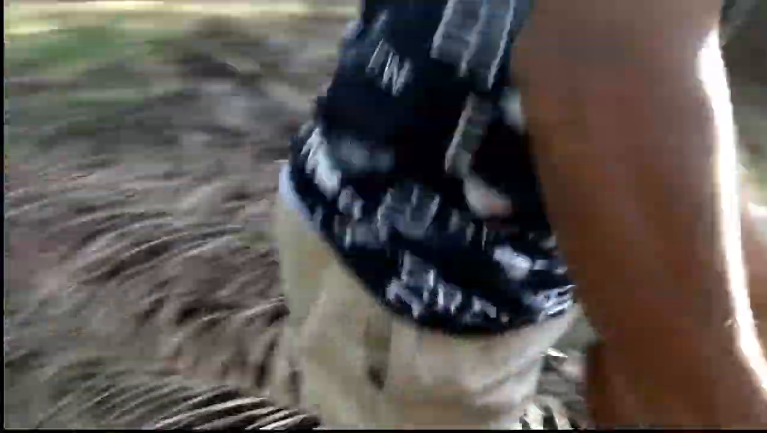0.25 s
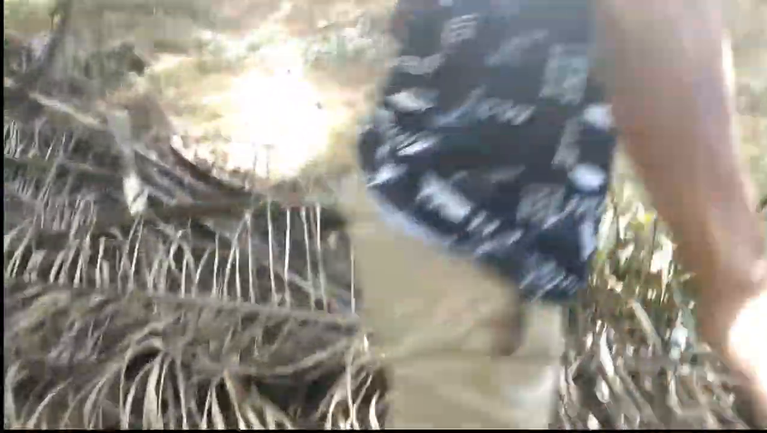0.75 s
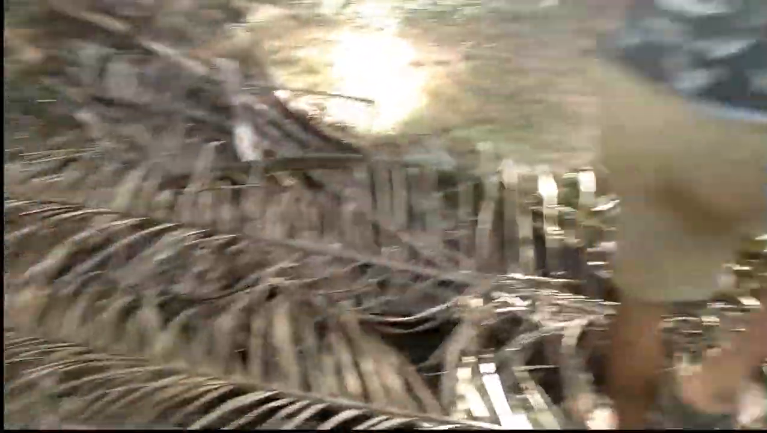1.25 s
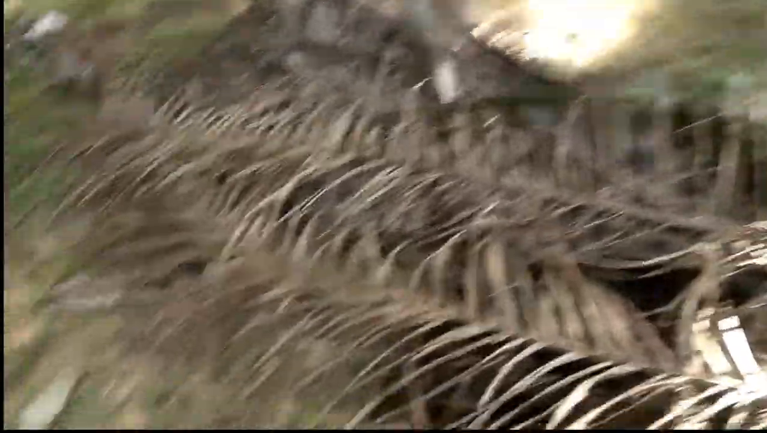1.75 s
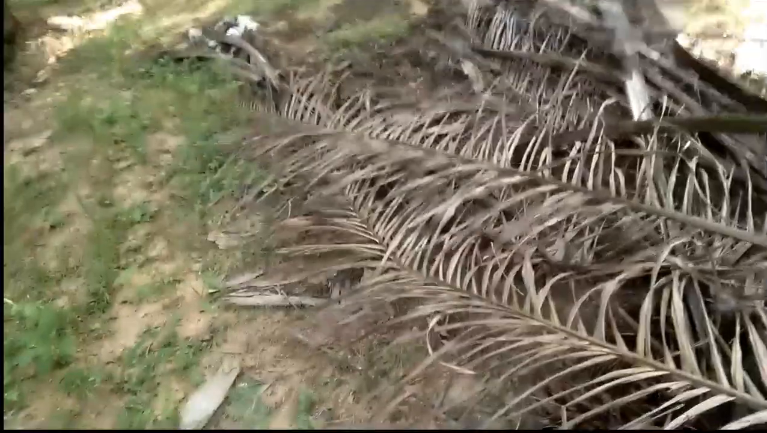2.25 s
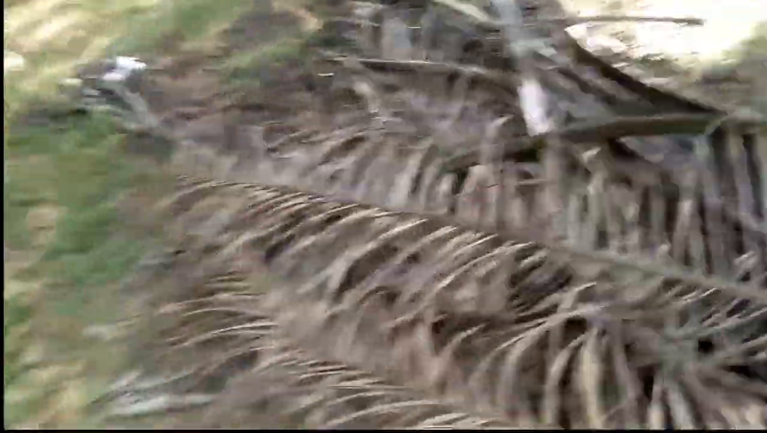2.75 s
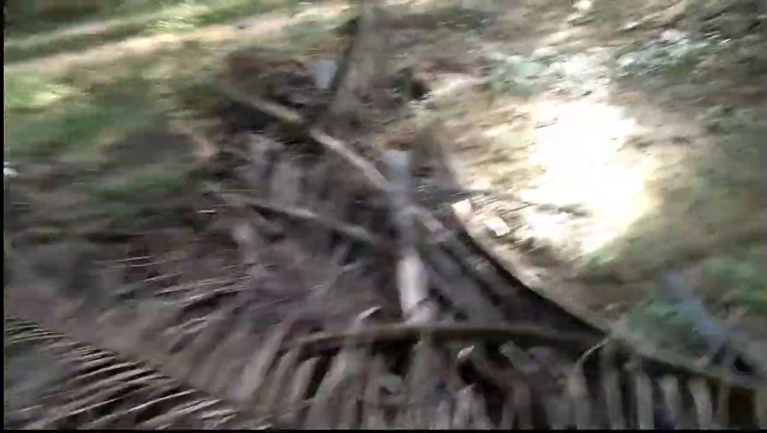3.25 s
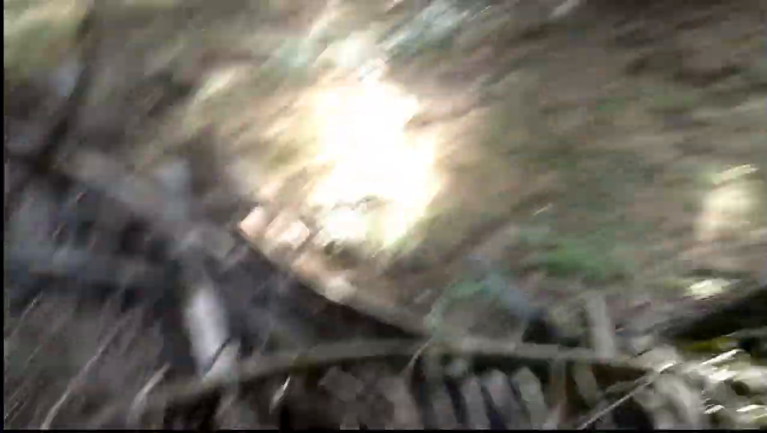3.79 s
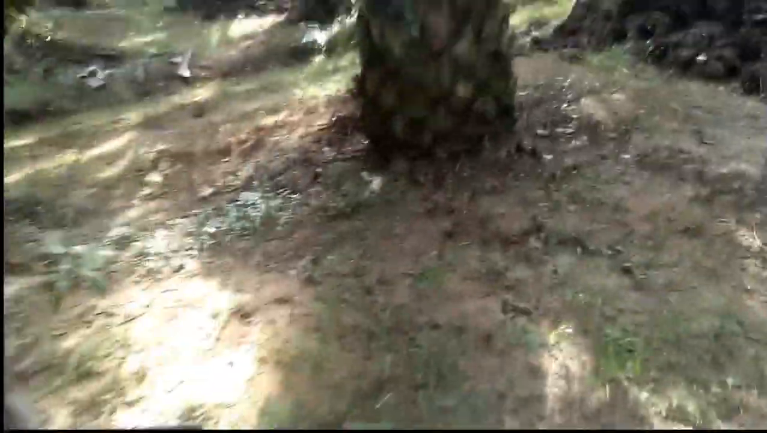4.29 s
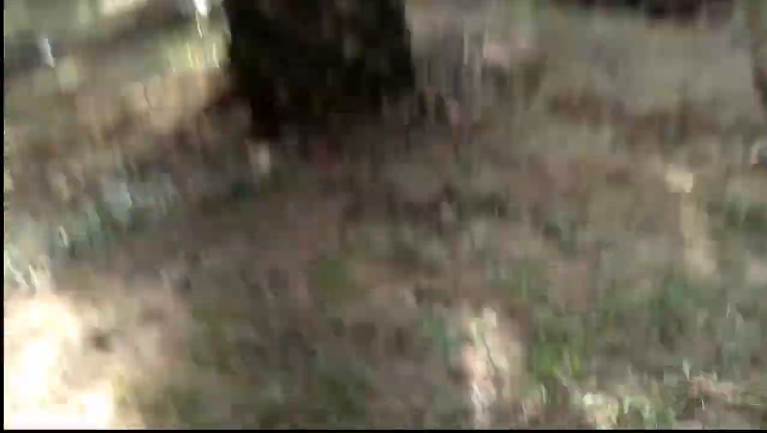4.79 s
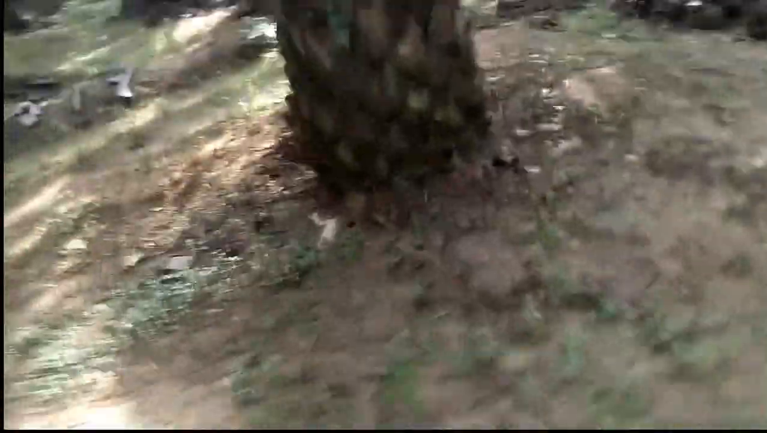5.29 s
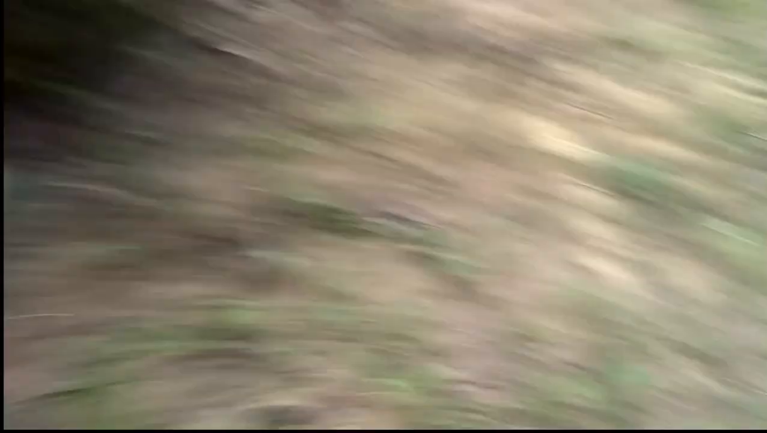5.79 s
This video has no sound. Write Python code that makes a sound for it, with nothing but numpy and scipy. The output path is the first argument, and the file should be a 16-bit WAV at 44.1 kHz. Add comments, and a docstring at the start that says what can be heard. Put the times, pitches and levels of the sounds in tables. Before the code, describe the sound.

Close to a handheld phone, dry palm fronds are brushed aside and trodden on in a quiet plantation. Crisp rustles and sharp snaps come in irregular bursts, loudest a little after two seconds, with a lull around four. Then snapping crowds together with hollow stalk knocks and a dull microphone bump before easing. Faint insects, a far engine and light wind lie beneath.

```python
"""Dry palm fronds are pushed aside and trodden on near a hand-held phone with two microphones.
Throughout, insects hiss in the plantation, a far engine hums and light wind rumbles (shaped noise).
Brittle leaflets rustle (many tiny cracks) and snap (short noise bursts) from the start, loudly near 2.2 s.
From 4.5 s snaps crowd together and hollow stalks knock (fading tones), most strongly near 5.15 s.
A frond jolts the left microphone twice near 5.3 s (sagging pressure steps), then the rustling eases."""
import sys
import numpy as np
from scipy import signal
from scipy.fft import rfft, irfft, next_fast_len
from scipy.io import wavfile
from scipy.ndimage import uniform_filter1d, map_coordinates

SR = 44100
rng = np.random.default_rng(int(sys.argv[2]) if len(sys.argv) > 2 else 0)


def int16_out(signal):
    """Quantize to a 16-bit WAV file."""
    q = np.round(np.clip(np.atleast_2d(signal).T, -1, 1) * 32767)
    wavfile.write(sys.argv[1], SR, q.astype(np.int16))


N = 265923  # length in samples

# Tone colour of the far hiss. Each row: frequency in Hz, gain in dB.
HISS_COLOUR = [(100, -43), (170, -18), (400, -2.5), (800, -24), (1500, -15), (3000, -12), (6000, -12),
               (10000, -21), (15300, -2)]
# The insect chorus, one row: centre in Hz, width of the resonance in Hz, level in dB.
INSECT_BAND = (7050, 720, -58.5)
# Resonances of the engine hum. Each row: centre in Hz, width in Hz, relative level in dB.
ENGINE_TONES = [(52, 9.6, 0), (94, 20, -38), (122, 16, -17.5), (322, 2.8, -21)]
# Tone colour of the wind rumble. Each row: frequency in Hz, gain in dB.
WIND_COLOUR = [(8, 7.5), (18, 5.5), (35, -2), (60, -14), (120, -47.5)]
# Wind strength over time. Each row: time in seconds, level in dB.
WIND_LEVELS = [(0, -53), (.32, -52), (.49, -63.5), (.94, -51), (1.55, -60.5), (2.95, -50), (3.6, -57),
               (3.92, -52), (4.11, -60), (4.95, -42), (5.24, -44), (5.8, -40), (6.03, -46)]
# How alike left and right are in far sounds. Each row: frequency in Hz, likeness from -1 to 1.
LEFT_RIGHT_LIKENESS = [(60, 0.93), (300, 0.71), (700, 0.2), (1400, -0.24), (3000, -0.78), (7000, 0.24)]
# Pushes on the left microphone. Each row: start in seconds, size of the step in dB.
MICROPHONE_JOLTS = [(5.2775, -16.5), (5.2993, -5.5)]
# Stalks knocked or trodden on. Each row: start in seconds, peak in dB, pitch in Hz.
STALK_KNOCKS = [(.993, -39, 670), (1.013, -33, 321), (1.016, -31, 700), (1.021, -31, 312),
                (2.155, -40.5, 507), (2.307, -40.5, 990), (4.895, -33, 980), (4.983, -24.5, 877),
                (5.139, -29, 706), (5.145, -14, 590), (5.15, -19, 806), (5.16, -21, 770),
                (5.186, -29.5, 786), (5.229, -18.5, 610), (5.299, -19.5, 706), (5.308, -16, 653),
                (5.503, -45.5, 306), (5.759, -40, 644), (5.875, -36.5, 650), (5.904, -42, 690),
                (6.012, -33, 376), (6.02, -28.5, 259), (6.026, -29, 330)]
# Single leaflets breaking. Each row: start in seconds, thin-leaf peak in dB,
# broad-leaf part in dB relative to that, left level minus right level in dB.
LEAF_SNAPS = [(.185, -16, -9.5, -0.5), (0.3183, -17.5, -12, -1), (0.6804, -28, -30, -6),
              (.7245, -27, -32, 6), (.7767, -24, -19, -4), (.793, -16.5, -14, 5), (.8249, -10.5, -31, 3.5),
              (.8463, -21, -15, 5), (.867, -13.5, -22, 5), (.937, -20, -12, 1), (.9502, -17.5, -14, 0),
              (.9678, -17, -15, 3), (0.995, -10, -20, -9), (1.0143, -10, -12.5, 7), (1.025, -16, -8, 0),
              (1.103, -22, -12, 11), (1.111, -20, -7, -4), (1.192, -24, -26, 1), (1.3147, -22, -17, 2),
              (1.342, -21.5, -19, 3), (1.3721, -24, -15, 1), (1.387, -21.5, -15, -4),
              (1.4263, -12.5, -24, 5.5), (1.706, -18, -27, 4), (1.7116, -9, -9, 5), (1.8706, -27, -37, 3.5),
              (2.021, -27.5, -22, -4), (2.1509, -14.5, -23, 6), (2.155, -3.5, -19.5, 3),
              (2.234, -1.5, -20, 7), (2.2486, -18, -17, 1), (2.6604, -29, -21, 10),
              (2.8489, -23.5, -21, 8.5), (2.8675, -23, -12, 4), (2.9022, -13.5, -15, 5),
              (2.917, -26, -20, 9), (2.943, -11.5, -33, 11.5), (3.4744, -16.5, -23.5, 2),
              (3.5602, -9.5, -19.5, 2.5), (4.48, -21, -29, 10), (4.5325, -6.5, -23, 5),
              (4.5984, -17, -9, 3), (4.6472, -4, -14, 0), (4.8108, -25, -9, 2), (4.8763, -21, -20, 3),
              (4.8955, -20, -10, 5), (4.9839, -7.5, -11, 2), (5.081, -18, -8, -3), (5.096, -10.5, -18, 9),
              (5.1399, -8.5, -2.5, 8), (5.1463, -5.5, -7, 2), (5.149, -10, -6, 6), (5.1639, -6, -6, 9.5),
              (5.1684, -12, -17, 2), (5.2136, -5.5, -20, 1), (5.219, -9, -13, 5), (5.2291, -5, -15, 4),
              (5.2601, -15, -16, 5), (5.2782, -5, -15, 2), (5.2945, -8.5, -10, 14), (5.2995, -5, 1, 2.5),
              (5.3062, -12, -13, 0), (5.4264, -24, -23, 7), (5.669, -31, -15, 7), (5.696, -30, -19, -7),
              (5.7236, -26.5, -13, 8), (5.7595, -20, -13.5, .5), (5.8085, -14.5, -23, 6),
              (5.8613, -8.5, -13, 8), (5.8735, -17, -21, 10), (5.9042, -10, -14, 7),
              (5.9607, -17, -22, 13.5)]
# Fronds brushed, pulled or crushed. Each row: loudest moment in seconds, level in dB, seconds to rise
# 20 dB, seconds to fall 20 dB, then broad leaves and stalks, both in dB relative to the level.
FROND_STROKES = [(0, -43.5, .1, .6, -11, -15.5), (.31, -37, 0.47, 0.17, -13, -17),
                 (.7, -46, 1.3, 0.7, -12, -17), (.838, -32, .04, 0.2, -15, -17),
                 (1.016, -19.5, 0.0079, 0.05, -9.5, -14), (1.06, -34, 0.26, .15, -11.5, -28),
                 (1.119, -36.5, 0.2, 0.23, -10.5, -30), (1.384, -35, .02, .035, -20, -35),
                 (1.433, -40, 0.1, 0.03, -14.5, -20), (1.505, -44, 0.1, 0.16, -7.5, -24),
                 (1.632, -36.5, .03, .2, -15, -15), (1.672, -32, .05, .05, -13, -27),
                 (1.71, -28, .012, .15, -15, -28), (2.158, -36, 0.21, 0.37, -9.5, -26),
                 (2.247, -33, 0.07, 0.15, -19, -28), (2.495, -33, 0.1, .16, -14.5, -30),
                 (2.754, -44, .5, 0.7, -14, -25), (2.954, -33.5, 0.15, 0.35, -11.5, -16.5),
                 (3.098, -35, 0.46, .42, -13.5, -20), (3.44, -43, 0.03, 0.1, -13, -17),
                 (3.485, -34, 0.1, 0.16, -15.5, -17.5), (3.56, -39.5, 0.07, 0.1, -13.5, -17),
                 (3.912, -43.5, 0.27, 0.17, -9.5, -9.5), (4.42, -41, .04, .3, -7, -14),
                 (4.489, -35.5, 0.1056, .15, -10, -24), (4.539, -28.5, 0.06, 0.17, -15, -22),
                 (4.6, -30, .1, .1, -11, -20), (4.675, -22.5, .15, .075, -12.5, -22),
                 (4.78, -39, 0.06, .2, -11, -16.5), (4.905, -35, 0.09, 0.26, -7, -13),
                 (4.998, -22, .055, 0.0829, -10.5, -13), (5.092, -31.5, 0.07, .09, -7.5, -9),
                 (5.144, -18, 0.0169, .19, -9, -12.5), (5.21, -27, 0.14, .16, -13, -13),
                 (5.303, -15.5, 0.0165, 0.0427, -5.5, -16.5), (5.329, -28.5, 0.03, 0.16, -8, -16),
                 (5.6, -50, 0.5, .1, -8, -14), (5.772, -44.5, 0.2, 1.5, -20, -18),
                 (5.869, -32, 0.12, 0.15, -11, -20), (6.03, -41, 0.48, -2, -7.5, -11.5)]
# Tone colours of thin leaflets, broad leaves and stalks. Each row: frequency in Hz, gain in dB.
THIN_COLOUR = [(900, -68), (2500, -79), (4500, -13.5), (6000, -9), (8000, -4.5), (10500, 0.5),
               (13000, -2.5), (15300, -7.5)]
BROAD_COLOUR = [(200, -70), (500, -21), (1300, -7.5), (2000, -5.5), (2700, -2), (4000, -2), (5000, -4.5),
                (8000, -27)]
STALK_COLOUR = [(80, -27), (250, -3), (600, -2), (1000, -7.5), (1500, -10.5), (3000, -13)]

HISS_DB, HUM_DB, HUM_WAVERS_DB = -55, -57, 1.3
KNOCK_CYCLES = 11.7  # cycles until a stalk has faded 60 dB, so low ones last longer
SNAP_T60 = 0.0086  # seconds for the main part of a snap to fade 60 dB
# fronds settling between strokes; broad leaves and stalks are relative to the first level
STIR_DB, STIR_BROAD_DB, STIR_STALK_DB = -53, -11, -13
CRACKS_PER_S, CRACK_SPREAD_DB, CRACK_T60 = 600, 4.0, 0.0049  # T60 in seconds
SCRAPE_DB, CLUMP_DB = 7.5, 0.72  # scrape is relative to the cracks
RUSTLE_PAN_DB = 1.34  # left minus right
TOP_HZ, EDGE_HZ = 15600, 16800  # where the treble drops, and where it stops


def amp(db):
    """Turn dB into a plain multiplier."""
    return 10 ** (np.asarray(db) / 20)


def unit(x):
    """Scale to an average (rms) strength of 1."""
    return x / np.sqrt(np.mean(x ** 2) + 1e-20)


def along(points, hz):
    """Read a curve of (Hz, value) points, joined by lines on a log frequency axis."""
    f, v = np.transpose(points)
    return np.interp(np.log(hz + 1), np.log(f + 1), v)


def wobble(rate):
    """A smooth random curve with `rate` random points a second."""
    points = rng.standard_normal(int(N * rate / SR) + 4)
    return map_coordinates(points, [np.arange(N) * rate / SR])


def filtered(x, response):
    """Multiply each frequency of x by a gain; the padding keeps the end off the start."""
    m = next_fast_len(x.shape[-1] + 8192)
    spectrum = rfft(x, m) * response(np.fft.rfftfreq(m, 1 / SR))
    return irfft(spectrum, m)[..., :x.shape[-1]]


def coloured(x, colour):
    """Give x a tone colour, then scale it to rms 1."""
    return unit(filtered(x, lambda hz: amp(along(colour, hz))))


def resonances(modes, f):
    """Gain of several resonances added together, each strongest at its centre."""
    return sum(amp(db) * f * w / np.abs(c * c - f * f + 1j * f * w) for c, w, db in modes)


def pair(n, shared, lead):
    """Two-channel noise; the shared part reaches the left microphone `lead` samples first."""
    left, other = rng.standard_normal((2, n))
    right = shared * np.roll(left, lead) + np.sqrt(1 - shared ** 2) * other
    return np.array([left, right])


def sides(pan_db):
    """Left and right gains that differ by pan_db."""
    return amp(np.array([pan_db / 2, -pan_db / 2]))


def patchy(x, depth_db, size=256, order=5):
    """Make the colour uneven: random gain in small patches of time and frequency."""
    z = signal.stft(x, nperseg=size)[2]
    field = rng.standard_normal(z.shape[1:])
    field = uniform_filter1d(field, size=order, axis=0)  # patches `order` frequency bins wide
    field = uniform_filter1d(field, size=3, axis=1)
    return signal.istft(z * amp(depth_db * unit(field)), nperseg=size)[1][:, :x.shape[1]]


def ambient():
    """Far-sound noise, mixed from a middle and a side part so left-right likeness varies with pitch."""
    def middle_and_side(hz):
        turn = np.arccos(np.clip(along(LEFT_RIGHT_LIKENESS, hz), -1, 1)) / 2
        return np.array([np.cos(turn), np.sin(turn)])

    mid, side = filtered(rng.standard_normal((2, N)), middle_and_side)
    return np.array([mid + side, mid - side])


def hiss():
    """Far hiss of the plantation: coloured noise with a slight waver."""
    return amp(HISS_DB + 0.36 * wobble(5.796)) * coloured(ambient(), HISS_COLOUR)


def insects():
    """An insect chorus: noise narrowed to one high band by a squared resonance."""
    hz, width, db = INSECT_BAND
    chorus = unit(filtered(ambient(), lambda f: resonances([(hz, width, 0)], f) ** 2))
    return amp(db + 0.4 * wobble(3.1)) * chorus


def engine():
    """A far engine: noise through a few low resonances makes a wavering hum."""
    hum = unit(filtered(ambient(), lambda f: resonances(ENGINE_TONES, f)))
    return amp(HUM_DB + HUM_WAVERS_DB * wobble(2.88)) * hum


def wind():
    """Low rumbling noise, partly different at each microphone, rising and falling in gusts."""
    seconds, db = np.transpose(WIND_LEVELS)
    gusts_db = np.interp(np.arange(N) / SR, seconds, db)
    return amp(gusts_db) * coloured(pair(N, 0.27, lead=0), WIND_COLOUR)


def jolts(fast=0.026, slow=0.044, rise=0.0014):
    """A pressure step on the membrane; the vent and input stage let it sag, overshoot and settle."""
    out, t = np.zeros((2, N + SR)), np.arange(SR // 2) / SR
    sag = (slow * np.exp(-t / fast) - fast * np.exp(-t / slow)) / (slow - fast)  # times in seconds
    step = (1 - np.exp(-t / rise)) * sag
    for s, db in MICROPHONE_JOLTS:
        out[0, round(s * SR):][:len(t)] -= amp(db) * step
    return out[:, :N]


def knocks():
    """A hollow stalk answers with a few cycles at its pitch and a weaker overtone that fades sooner."""
    out, t = np.zeros(N + SR), np.arange(4096) / SR
    for s, db, hz in STALK_KNOCKS:
        t60 = KNOCK_CYCLES / hz
        overtone = np.sin(2 * np.pi * 1.61 * hz * t + rng.uniform(0, 5.9))
        ring = np.sin(2 * np.pi * hz * t) + amp(-3.5 - 30 * t / t60) * overtone
        ring *= amp(-60 * t / t60) * (1 - np.exp(-t / 0.00047))
        out[round(s * SR):][:len(t)] += amp(db) * ring / np.abs(ring).max()
    left = out[:N]
    return np.array([left, amp(-1.5) * np.roll(left, 12)])  # right is later and a little weaker


def snaps():
    """Each break is a noise burst: a sharp spike, a quick fall and a weaker shiver after it."""
    def peak_one(x):
        return x / np.abs(x).max(axis=1, keepdims=True)

    out, t = np.zeros((2, N + SR)), np.arange(2048) / SR
    spike = amp(5.5 - 60 * t / 0.0025)
    fall = amp(-60 * t / SNAP_T60)
    shiver = amp(-18 - 60 * t / 0.041)
    shape = (1 - np.exp(-t / 0.00033)) * (spike + fall + shiver)
    for s, db, broad_db, pan_db in LEAF_SNAPS:
        noise = patchy(pair(len(t), 0.11, lead=14), depth_db=2)
        thin = peak_one(shape * coloured(noise, THIN_COLOUR))
        broad = peak_one(shape * coloured(noise, BROAD_COLOUR))
        burst = thin + amp(broad_db) * broad
        out[:, round(s * SR):][:, :len(t)] += amp(db) * sides(pan_db)[:, None] * burst
    return out[:, :N]


def strokes():
    """Gains of thin leaflets, broad leaves and stalks: strokes swell and fade, and their powers add."""
    t = np.arange(N) / SR
    power = amp(STIR_DB + np.array([[0], [STIR_BROAD_DB], [STIR_STALK_DB]])) ** 2 * np.ones(N)
    for s, db, rise, fall, broad_db, stalk_db in FROND_STROKES:
        swell = amp(db - 20 * np.where(t < s, (s - t) / rise, (t - s) / fall))
        power += (amp([[0], [broad_db], [stalk_db]]) * swell) ** 2
    return np.sqrt(power)


def crackle():
    """Loudness of hundreds of tiny cracks a second, few large and many small, over a smooth scrape."""
    size_db = CRACK_SPREAD_DB * np.minimum(rng.exponential(size=N), 5)
    cracks = (rng.random(N) < CRACKS_PER_S / SR) * amp(2 * size_db)  # doubled dB gives power
    t = np.arange(SR // 20) / SR
    power = np.abs(signal.fftconvolve(cracks, amp(-120 * t / CRACK_T60))[:N])
    return (unit(np.sqrt(power)) + amp(SCRAPE_DB)) * amp(CLUMP_DB * wobble(40))


def rustle():
    """Fronds rub and crush: crackling noise in three leaf colours follows the strokes."""
    thin_gain, broad_gain, stalk_gain = strokes()
    grain = crackle()

    def uneven(shared, depth_db):
        # random gain in thin frequency bands makes the rustle slightly tonal and uneven
        return grain * patchy(pair(N, shared, lead=12), depth_db, size=1024, order=2)

    thin = coloured(patchy(uneven(0.094, depth_db=4.0), depth_db=3.0), THIN_COLOUR)
    broad = coloured(patchy(uneven(0.3, depth_db=5.5), depth_db=2.5), BROAD_COLOUR)
    stalk = coloured(patchy(grain * pair(N, 0.92, lead=10), depth_db=4), STALK_COLOUR)
    mix = thin_gain * thin + broad_gain * broad + stalk_gain * stalk
    return sides(RUSTLE_PAN_DB)[:, None] * mix


def scene():
    """Add the background, the microphone jolts and the fronds."""
    background = hiss() + insects() + engine() + wind()
    return background + jolts() + knocks() + snaps() + rustle()


def record(dry):
    """The input stage rounds off high peaks; the phone drops the top treble 24 dB, then cuts it off."""
    soft = dry / (1 + np.abs(dry / .8) ** 4) ** (1 / 4)

    def band_limit(hz):
        drop = np.clip((hz - TOP_HZ) / 500 + .5, 0, 1)  # a slope 500 Hz wide
        return amp(-24 * drop) * (hz < EDGE_HZ)

    return filtered(soft, band_limit)


dry = scene()
out = record(dry)
int16_out(out)
```